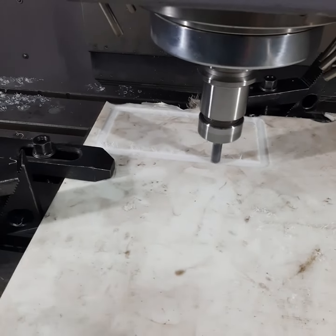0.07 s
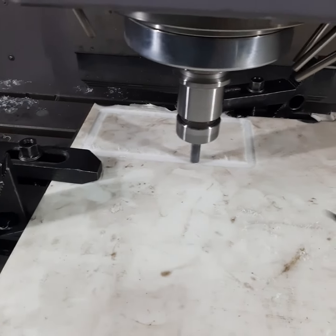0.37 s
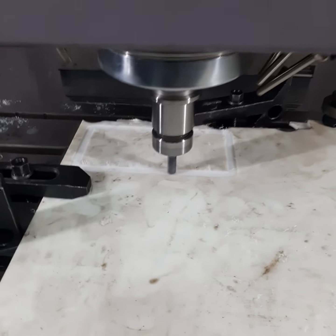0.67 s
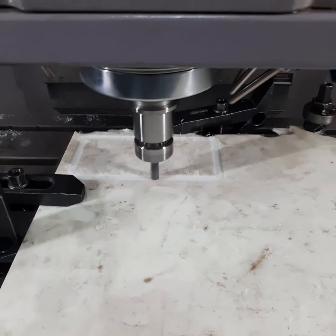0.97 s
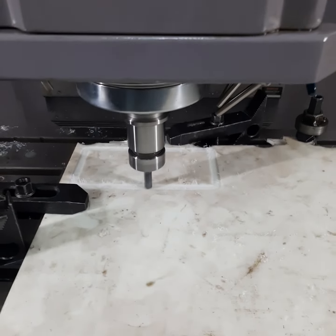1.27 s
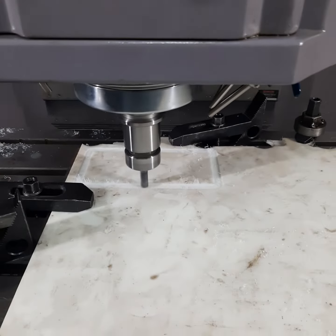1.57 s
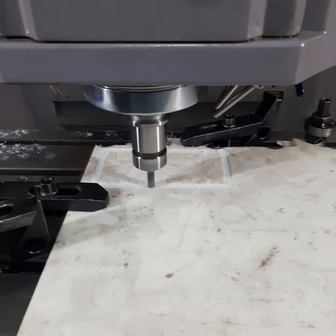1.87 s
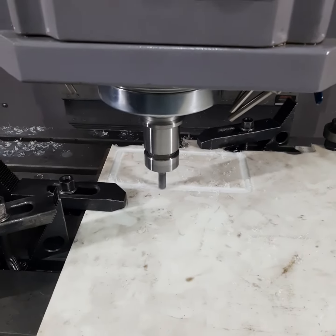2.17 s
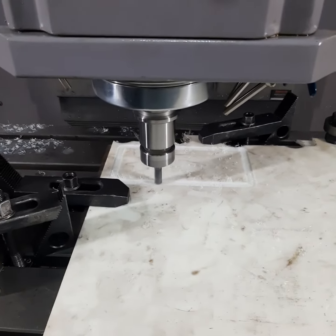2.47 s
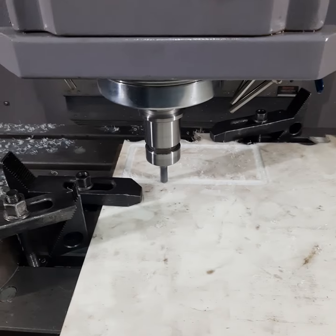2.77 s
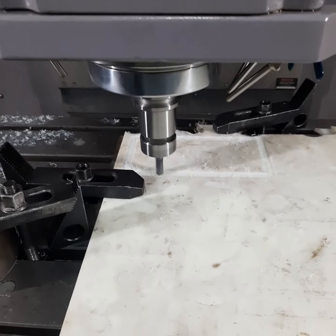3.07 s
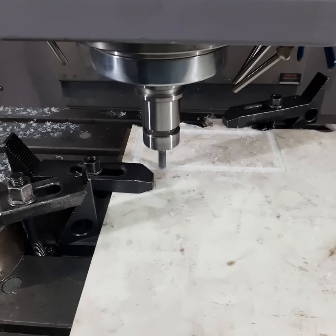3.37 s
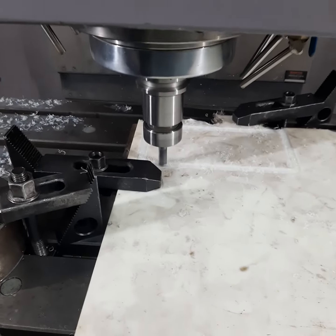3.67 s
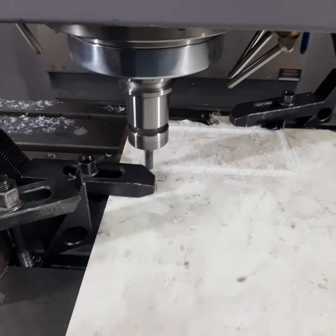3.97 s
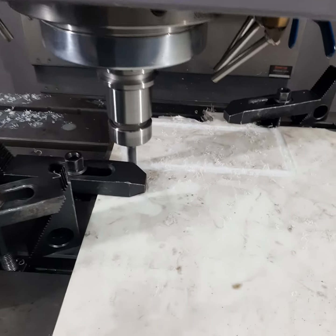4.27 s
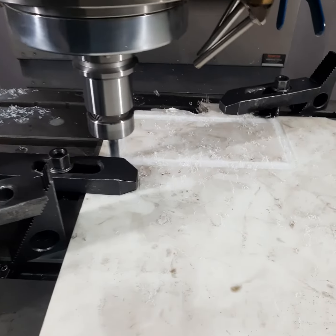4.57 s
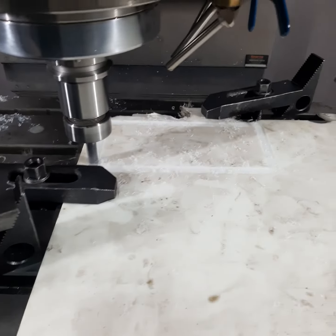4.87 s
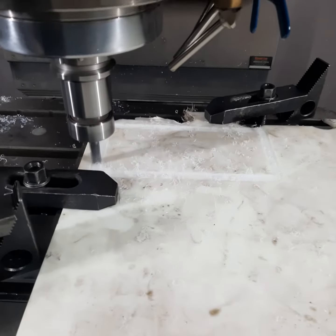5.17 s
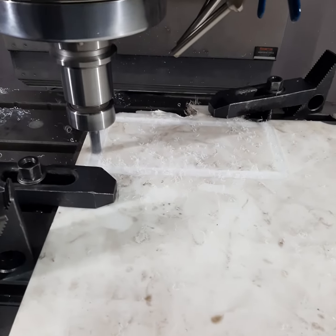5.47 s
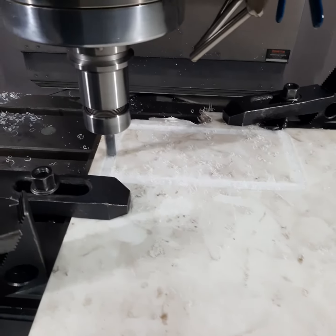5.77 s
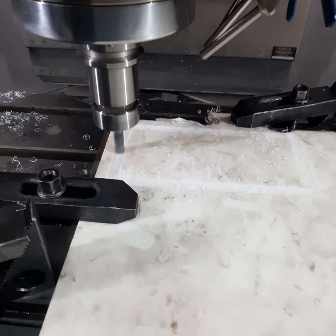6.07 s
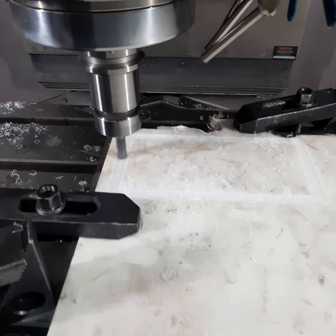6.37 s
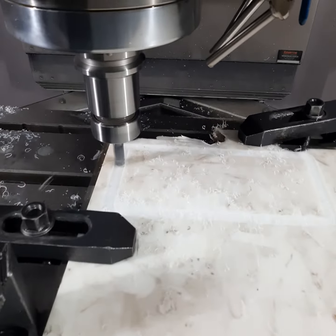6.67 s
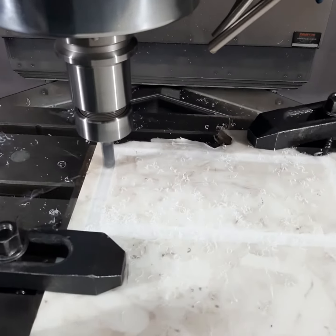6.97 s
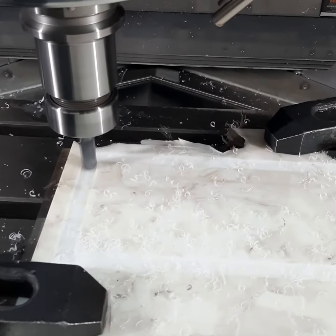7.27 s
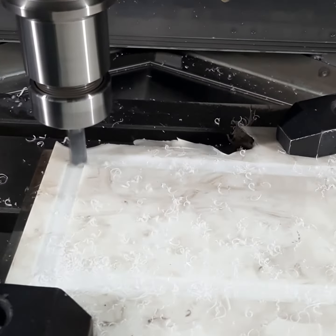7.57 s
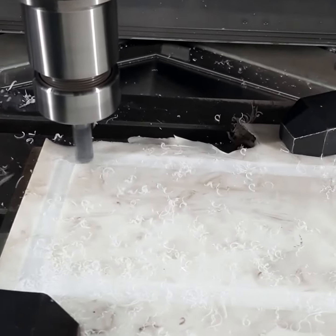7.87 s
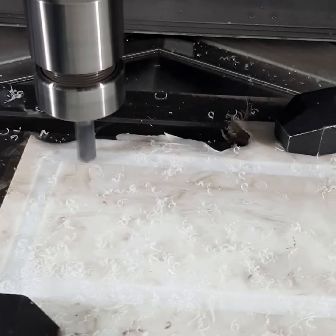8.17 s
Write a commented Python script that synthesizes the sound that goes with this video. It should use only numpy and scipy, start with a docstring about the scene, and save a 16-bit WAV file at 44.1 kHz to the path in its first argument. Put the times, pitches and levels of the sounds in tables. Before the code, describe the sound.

Inside a workshop machine enclosure, a short, sharp blast of air opens over a whining spindle and a humming pump. The level dips and recovers, and the cutter keeps rasping through a slab. A faint spit of air follows while a motor drone swells and fades. The cut changes tone at two turns, sounding fuller with fast, light ticks as the hand-held microphone closes in.

```python
"""A milling spindle spins at 1800 rpm inside a machine cabinet, whining and throbbing over a buzz and a pump's hum.
First an air gun blasts the chips away; the automatic volume control dips and creeps back a second later.
The cutter rasps across a slab; near 2 s a little air spits out while a drone of motors swells and fades.
At 4.7 s the cutter heads along the slab and at 7.7 s it heads back, with a new chord for each direction.
Through the second half the hand-held microphone closes in, and the cutter ticks more clearly."""
import sys
import numpy as np
from scipy import signal
from scipy.fft import rfft, irfft, next_fast_len
from scipy.io import wavfile
from scipy.ndimage import uniform_filter1d, minimum_filter1d, map_coordinates

SR = 44100
rng = np.random.default_rng(int(sys.argv[2]) if len(sys.argv) > 2 else 0)


def bounce(signal):
    """Save signal as a 16-bit WAV file at the path given by the first command-line argument."""
    frames = np.transpose(np.atleast_2d(signal))
    limited = np.clip(frames, -1, 1)
    pcm = np.round(limited * 32767).astype(np.int16)
    wavfile.write(sys.argv[1], SR, pcm)


N = 362061
TIME = np.arange(N) / SR
SPINDLE_HZ, PUMP_HZ, TOP_HZ = 29.988, 58.8, 15780
WHINE_ORDER = 48  # an "order" is a tone that vibrates this many times per turn of the spindle

# The whine's four tones change as the microphone moves through loud and quiet spots in the cabinet:
# (time [s], left level [dB], right level [dB], left ear's lead [rad], left throb [relative],
#  right throb [relative], swing between the ears [rad], pitch bend [rad])
FIRST_TONE = [(0.72, -42, -27.5, 1.6, 0.5, 0.07, 1.3, -0.5), (0.9, -37, -26.5, 4, 1.0, 0.2, 1.9, -0.7),
              (1.08, -37, -26.5, 0, 0.69, 0.1, 1.8, -0.79), (1.98, -31.5, -26.5, -1.5, 0.17, 0, 1.4, -0.78),
              (2.64, -39, -29.5, 0.5, 1.0, 0.3, 0.5, -0.3), (2.88, -37, -28.5, -2, 0.08, 0.3, -1.8, 0.7),
              (3.78, -32.5, -25, 0.7, 0, 0.24, -1.5, 0.76), (4.02, -38, -26.5, 3.5, 0.41, 0.09, -0.8, 0.5),
              (4.2, -30.5, -26.5, 3.5, 0, 0.3, -0.44, 0.2), (4.38, -29.0, -27.0, 4, 0, 0, -0.25, -0.27),
              (4.68, -30.5, -39, 3, 0, 0.44, -0.2, -0.23), (4.98, -31.5, -30, 7, 0.3, 0.04, 0.1, 0.4),
              (5.52, -27.0, -23, 8.5, 0.5, 0.16, -0.67, 0.46),
              (6.06, -28, -30.5, 9.5, 0.4, 0.3, -0.12, -0.1), (6.36, -35, -26, 8.5, 0.6, 0.65, 0.96, -0.5),
              (6.6, -35.5, -21.0, 10, 0.85, 0.24, -1.3, 0.4), (7.14, -35, -28.5, 10, 0.46, 0.4, -1.4, 0.3),
              (7.62, -31.5, -31.5, 10, 0.31, 0.75, 0.43, 0.071),
              (8.1, -36, -38.0, 11, 0.28, 0.79, 0.96, -0.3)]
SECOND_TONE = [(0.72, -36, -32, -1, 0.44, 0.11, 0.2, 0.1), (0.96, -25, -27, -2, 0.52, 0.03, -0.4, 0.42),
               (1.2, -34, -23.5, -2.5, 0.77, 0.09, 0.42, -0.1),
               (1.621, -40, -33, -2.3, 0.99, 0.01, 0.0049, -0.0036),
               (2.16, -43, -35, -0.8, 1.0, 0.72, -1.6, 0.3), (2.58, -31, -38, -1.2, 0.75, 0.26, 0.0, 0.0),
               (2.941, -31, -32.5, 0.5, 0.71, 0.06, -0.26, 0.1),
               (3.06, -32, -31, -1, 0.43, 0.05, -0.6, 0.1),
               (3.6, -28, -28.5, -1.1, 0.08, 0.21, -0.67, 0.22),
               (3.72, -29, -27, -0.5, 0.31, 0.19, -0.48, 0.22),
               (3.9, -33, -33, -1.3, 0.37, 0.42, -0.49, 0.48),
               (4.08, -27.5, -37, -4, 0.13, 0.61, 0.79, 0.074),
               (4.38, -36, -29, -8.5, 0.55, 0.37, 1.6, -0.0), (4.62, -28.5, -34, -8, 0.27, 0.5, 0.14, 1.4),
               (5.22, -32, -26.5, -8, 0.85, 0.23, 0.75, 0.36),
               (5.4, -33, -27, -6.5, 0.72, 0.22, -1.2, 0.62),
               (5.82, -27, -32, -8.5, 1.0, 0.36, -0.018, 0.72),
               (6.48, -30, -24.5, -7.7, 0.82, 0.1, 0.5, -0.29),
               (6.66, -30, -29.5, -7.7, 0.42, 0.29, -0.69, -0.15),
               (7.38, -26, -36, -8, 0.29, 0.52, -0.35, -0.3),
               (8.1, -24.5, -27, -8, 0.26, 0.31, 0.022, -0.2)]
THIRD_TONE = [(0.72, -38, -41.5, -1.7, 0.2, 0.61, 0.6, 0.4), (0.84, -26, -45.0, -0.5, 1.0, 0.7, 1.1, 0.072),
              (1.08, -26.5, -39, -8, 0.44, 0.42, -0.46, 0.31), (1.38, -25, -44.0, 1, 0.3, 0.73, 1.2, 0.44),
              (1.62, -30, -44.0, -5.5, 0.53, 0.48, 1.6, -1.4),
              (1.92, -28, -44.0, 1, 0.21, 0.91, -1.6, -1.3),
              (2.16, -21.5, -37, -4, 0.27, 0.31, -0.18, -0.59),
              (2.94, -28.5, -36.0, -3.5, 0.64, 0.15, -1.0, -0.49),
              (3.12, -32, -39, -3, 0.77, 0.75, -1.6, 0.42),
              (3.66, -22.5, -33, -0.7, 0.17, 0.3, -1.7, -0.32),
              (3.84, -31, -36.0, -0.4, 0.51, 0.4, 0.47, 1.4), (4.02, -27.5, -43, -2, 0.26, 0.57, 0.16, 0.3),
              (4.32, -32, -36, -4, 0.51, 0.45, 1.4, 0.1),
              (4.56, -21, -34.5, -3.5, 0.16, 0.47, 0.025, -0.67),
              (5.1, -29, -32, -5, 0.41, 0.31, -0.89, -0.31),
              (5.28, -28, -39.5, -1.5, 0.17, 0.63, 0.42, 0.27),
              (5.94, -18.5, -39, -4, 0.2, 0.33, -0.061, 0.091),
              (6.12, -21.5, -31.5, -3.5, 0.38, 0.25, 0.48, 0.06),
              (6.78, -24.5, -26.5, -2.5, 0.11, 0.13, -0.63, -0.28),
              (7.26, -20, -32, -4, 0.19, 0.24, -0.1, -0.83), (7.44, -22, -27, -3.5, 0.19, 0.15, -0.5, -0.6),
              (8.1, -25.5, -25, -2.5, 0.33, 0.31, -0.93, -0.18)]
FOURTH_TONE = [(0.72, -36, -58.5, -1, 0.46, 0.47, 0.7, 1.1), (1.44, -41, -56.5, 17, 0.42, 0.11, 1.3, -1.4),
               (1.98, -35, -59.0, 2, 0.92, 0.49, -1.5, -0.4), (2.22, -39, -62, 11, 0.15, 1.0, -1.5, 1.0),
               (3.36, -39.0, -56, 3, 0.52, 0.54, -0.8, -1.3), (3.66, -43, -56, 6, 0.96, 0.7, -0.9, -1.4),
               (3.84, -32.5, -50.5, 4.5, 0.65, 0.74, -1.1, -0.7),
               (4.08, -39, -47, 7.9, 0.27, 0.09, -1.3, -1.4),
               (4.32, -33, -54.0, 9.5, 0.48, 0.47, 1.3, -0.4), (4.5, -44, -51.0, 5.6, 0.22, 0.55, 0.8, 1.4),
               (4.92, -33.5, -59, 5, 0.58, 0.3, -1.4, -0.54),
               (5.64, -31, -62.0, 5.4, 0.12, 0.53, -0.56, 0.07),
               (6.0, -44, -52.0, 3, 0.41, 0.3, -0.82, -1.0),
               (6.84, -30, -56.0, 1.5, 0.29, 0.23, 0.2, -0.64), (8.1, -38, -64, 11, 0.32, 1.0, -1.6, -1.4)]
# Each tone's roughness: (base level far away [dB], base level close up [dB],
#  lower minus upper side tones [dB], head start of the right ear's throb [rad])
WHINE_RASP = [(-44.5, -49, 1, -1.45), (-47.5, -40.5, -1, -0.47), (-40.5, -38.5, 6, 1.3),
              (-48.5, -52.5, 5, 0.7)]


def whine(angle, throb=0.87, rasp_follow=0.32):
    """The drive sings four high tones; its slightly off-centre rotor makes them throb once a turn."""
    out = np.zeros((2, N))
    for k, rows in enumerate([FIRST_TONE, SECOND_TONE, THIRD_TONE, FOURTH_TONE]):
        order, columns = (k + 1) * WHINE_ORDER, curves(rows)
        far_db, near_db, lean_db, head_start = WHINE_RASP[k]
        db, lead, (swing, bend) = columns[:2], columns[2], columns[5:]
        depth = np.clip(throb * columns[3:5], 0, 1)
        turn = angle + np.array([[0], [head_start]]) + 0.11 * drift(4.3)
        lead = lead + swing * np.cos(turn[0])
        waver_db, waver_rad = .8 * drift(22.), .11 * drift(35.)
        phase = order * angle + np.array([lead, -lead]) / 2 + bend * np.sin(turn) + waver_rad
        pulse = 1 + depth * (np.cos(turn) + .15 * np.cos(2 * turn))
        out += amp(db + waver_db) * pulse * np.cos(phase)
        rasp_db = by_nearness(far_db, near_db) + rasp_follow * (db - db.mean())
        rasp = side_tones(angle, order, pairs=3, unrest=2.8, rate=9., falloff_db=5.5, lean_db=lean_db)
        out += amp(rasp_db) * rasp
    return out


# How the whistle rises and falls: (time [s], base level [dB])
WHISTLE_LEVEL = [(.7, -42), (2.3, -54), (2.9, -46), (3.45, -42.5), (3.75, -49), (4.1, -42), (4.7, -45),
                 (5.2, -43), (5.75, -39), (6.05, -56), (6.4, -43.5), (6.8, -44), (8.1, -45)]


def whistle(angle):
    """The whine's fifth tone frays into a cluster, centred one order low and heard on the left."""
    order = 5 * WHINE_ORDER - 1
    tone = amp(-3) * np.cos(order * angle + drift(2.77))
    fray = amp(-5) * side_tones(angle, order, pairs=3, rate=4., falloff_db=4.)
    return ears(22)[:, None] * amp(curves(WHISTLE_LEVEL)[0]) * (tone + fray)


# The spindle's thin tones: (order [cycles per turn])
HIGH_ORDERS = [56, 59, 68, 76, 116, 121, 123, 124, 134, 171, 182, 219]
# One row for each: (far level [dB], halfway level [dB], near level [dB],
#  side tones against the main tone [dB], left minus right [dB])
HIGH_LEVELS = [(-54, -54, -62, -10, 8), (-45, -54, -56, -12, 0), (-49, -40, -40.5, -7, -1),
               (-55, -49, -58, -19, 0), (-54, -41, -37, -25, 4), (-55, -35, -49, -12, 14),
               (-35, -43, -48, -14, 5), (-44, -61, -49, -6, 8), (-51, -42, -55, -6, 8),
               (-58, -57, -57, -23, 10), (-40.5, -51, -56, -7, 18), (-60, -60, -59, -11, 22)]


def thin_tones(angle):
    """The spindle adds faint high tones, each wavering on its own in either ear."""
    out = np.zeros((2, N))
    for order, (*levels_db, side_db, pan_db) in zip(HIGH_ORDERS, HIGH_LEVELS):
        tone = np.cos(order * angle + drift(0.93))
        level = amp(by_nearness(*levels_db) + 1.2 * drift(2.06))
        out += ears(pan_db)[:, None] * level * (tone + amp(side_db) * side_tones(angle, order, pairs=1))
    return out


# The tones that make up the buzz: (frequency [Hz], typical level of each [dB])
BUZZ_SPECTRUM = [(30, -68), (90, -54), (300, -52), (750, -51.5), (1200, -51.5), (1800, -62.5),
                 (2400, -63.5), (3000, -56.5), (4300, -57.5), (5300, -59), (7000, -71.5), (11500, -100),
                 (15000, -96)]


def buzz(angle, scatter_db=5.0, changing_share=0.8, size=8192):
    """Every turn repeats one rough pattern, which shifts as the microphone moves through the echoes."""
    hz = np.arange(int(TOP_HZ / SPINDLE_HZ)) * SPINDLE_HZ
    db = read(BUZZ_SPECTRUM, hz) + scatter_db * rng.standard_normal(len(hz))
    level = amp(db) * machine_ears(hz) * (hz > 0)
    level[:, CHORD_ORDERS] = 0  # the cut and the whine play their own orders
    level[:, [k * WHINE_ORDER + side for k in (1, 2, 3) for side in (-1, 0, 1)]] = 0
    steady = np.sqrt(1 - changing_share) * np.exp(1j * np.angle(random_pair(hz)))
    place = angle / (2 * np.pi) % 1 * size
    moments = np.linspace(0, TIME[-1], 15)
    out = np.zeros((2, N))
    for moment in moments:  # each pattern fades into the next
        changing = np.sqrt(changing_share) * random_pair(hz)
        pattern = irfft(level * (steady + changing), size) * size / np.sqrt(2)
        fade = 1 - abs(TIME - moment) / moments[1]
        now = fade > 0
        out[:, now] += fade[now] * np.array([np.interp(place[now], np.arange(size), e) for e in pattern])
    return out


# The cutter's passes across the slab, along it and back: (start [s], end [s])
PASSES = [(-0.2, 4.66), (4.68, 7.62), (7.66, 8.6)]
# The low tones that cutting draws from the slab: (order [cycles per turn])
CHORD_ORDERS = [8, 10, 12, 13, 14, 15, 16, 17, 18, 19, 20, 22, 24, 33, 37, 38, 39]
# Each tone's level: (across start [dB], across middle [dB], across end [dB],
#  along start [dB], along middle [dB], along end [dB], way back [dB])
CHORD_LEVELS = [(-30.5, -30, -29.5, -38.5, -36.5, -37, -27), (-56, -44.5, -35.5, -43, -43, -41, -37),
                (-67, -74, -56, -36, -37.5, -51, -56), (-34, -37, -57, -49, -47, -57, -58),
                (-37.5, -32.5, -48, -63, -64, -51, -57), (-32, -45, -67, -53, -44, -34.5, -36.5),
                (-44, -32.5, -41, -39, -39, -44, -42), (-35.5, -39, -63, -56, -64, -53, -42),
                (-62, -59, -45, -42, -36.5, -38, -54.5), (-33, -39, -46, -44, -38, -33.5, -41),
                (-32.5, -42, -52, -55, -46, -49, -54), (-56, -46, -53, -58, -36, -33.5, -34.5),
                (-37, -41, -47, -62, -55, -58, -60), (-57, -40, -44, -57, -63, -52, -56),
                (-47, -37.5, -45, -49, -57, -43, -49), (-52, -41, -39, -40, -36.5, -38, -45),
                (-53, -57, -53, -39, -63, -52, -37)]


def cut_chords(angle, fade_s=0.25, middle=0.42):
    """Each pass has its own unsteady chord, which shifts as the cutter travels and fades at corners."""
    out = np.zeros((2, N))
    chords = np.split(np.array(CHORD_LEVELS), [3, 6], axis=1)
    for (start, end), chord in zip(PASSES, chords):
        now = (TIME >= start) & (TIME < end)
        t = TIME[now]
        progress = (t - start) / (end - start)
        from_corner_s = np.minimum(t - start, end - t)
        fade = np.sin(np.pi / 2 * np.minimum(from_corner_s / fade_s, 1)) ** 2
        for order, levels in zip(CHORD_ORDERS, chord):
            hz = order * SPINDLE_HZ
            waver_db, waver_rad = drift(7., t=t) * np.array([[1.6], [.3]]) * np.sqrt(hz / 500)
            db = np.interp(progress, [0, middle, 1][:len(levels)], levels) + waver_db
            # short waves reach the two ears out of step
            apart = (1 - read(EAR_LIKENESS, hz)) * np.array([[1], [-1]]) * np.pi / 4
            tone = np.cos(order * angle[now] + apart + waver_rad)
            out[:, now] += machine_ears(hz)[:, None] * fade * amp(db) * tone
    return out


# The rush of cutting and cooling: (frequency [Hz], level [dB per Hz])
RUSH_SPECTRUM = [(20, -100), (32, -91), (50, -55.5), (85, -67), (135, -56.5), (230, -62.5), (330, -57.5),
                 (720, -64.5), (830, -61), (930, -58), (1100, -70), (1500, -64.5), (1750, -71.5),
                 (2050, -66.5), (2400, -70.5), (3100, -66.5), (3600, -66.5), (3870, -67), (4400, -65),
                 (5600, -72), (7100, -72.5), (11500, -88.5), (15300, -96)]


def cutter(angle, tick_sharpness=4.9):
    """The cutter rasps; close up it sounds fuller and ticks once a turn, ringing at two pitches."""
    rush = noise(lambda hz: amp(read(RUSH_SPECTRUM, hz)) * machine_ears(hz))
    rush *= (1 + 0.0049 * np.cos(angle)) * amp(0.055 * drift(2.4, channels=1))
    rings = amp(-37) * (band(3600, octaves=0.052) + band(2050, octaves=0.065))
    tick = np.exp(tick_sharpness * (np.cos(angle) - 1)) * rings
    body = amp(-39) * band(850, octaves=0.91)
    return rush + by_nearness(0, 1) * (tick + body)


# Groans of the cut:
# (time [s], half length [s], pitch [Hz], width [octaves], left level [dB], right level [dB])
GROANS = [(2.87, 0.2, 520, 0.26, -38, -37), (2.85, 0.23, 940, 0.12, -41, -39),
          (2.79, 0.043, 870, 1.9, -28.5, -34), (2.9, 0.24, 123, 0.13, -36.5, -36),
          (5, 0.39, 160, 0.53, -43, -49), (7.76, 0.32, 130, 0.7, -34.5, -34.5)]


def rumbles():
    """The cut rumbles and groans in places, as at the corners of its path."""
    return swells(GROANS)


# The air gun's hiss: (frequency [Hz], base level [dB per Hz])
AIR_SPECTRUM = [(20, -95), (70, -52), (200, -53), (550, -53), (1200, -53.5), (2500, -53), (3500, -50),
                (4300, -48.5), (5500, -44.5), (6900, -40.5), (7700, -41.5), (10000, -46.5), (11800, -53),
                (14000, -53), (15400, -49.5)]
# Its flow until the valve shuts: (time [s], level change [dB])
AIR_FLOW = [(0, 0), (.365, 0), (.39, 0), (.41, -3), (.47, 3), (.5, -1), (.562, -2)]
# How far it leans to the left: (frequency [Hz], left minus right [dB])
AIR_BALANCE = [(60, 21.5), (110, 23), (200, 18.5), (380, 20), (700, 13), (1290, 5), (2380, 2), (3700, 4),
               (4800, 10.5), (7000, 23), (10000, 11.5), (15000, 7)]


def air_gun(echo_s=0.37):
    """A jet of air hisses and flutters; when the valve shuts, the sound dies away in the cabinet."""
    jet = noise(lambda hz: amp(read(AIR_SPECTRUM, hz)) * ears(read(AIR_BALANCE, hz)), likeness=0.5)
    tail_db = -60 * np.maximum(TIME - AIR_FLOW[-1][0], 0) / echo_s
    flutter_db = drift(58.7, channels=1)
    return jet * amp(curves(AIR_FLOW)[0] + tail_db + flutter_db)


# Bursts in the jet:
# (time [s], half length [s], pitch [Hz], width [octaves], left level [dB], right level [dB])
AIR_BURSTS = [(.195, 0.031, 1170, 1.4, -12.5, -18), (.315, 0.02, 1530, 0.72, -17.5, -14),
              (.498, 0.014, 250, 1.8, -15, -32), (.54, 0.024, 610, 1.4, -18.5, -20),
              (.552, 0.019, 4230, 0.29, -9, -18)]


def sputters():
    """The jet sputters as it sweeps over edges."""
    return swells(AIR_BURSTS)


# The pump's loudest tone, at three times its base pitch: (time [s], level [dB])
PUMP_THIRD = [(0.72, -30), (1.2, -26.5), (2.48, -29), (2.8, -26.5), (4.64, -28), (4.88, -26), (6.48, -28.5),
              (7.44, -28.0), (8.16, -30)]
# The other motors' steady hum: (frequency [Hz], level [dB])
MOTOR_HUMS = [(52, -42.5), (41.0, -67), (133.1, -47.5), (373.4, -46), (403, -45)]


def hum(angle):
    """The pump's hum pulses against the spindle's nearby sixth order; other motors join in."""
    pump = 2 * np.pi * PUMP_HZ * TIME
    out = amp(-42) * np.cos(pump) + amp(curves(PUMP_THIRD)[0]) * np.cos(3 * pump)
    out += amp(-42) * np.cos(6 * angle)
    for hz, db in MOTOR_HUMS:
        out = out + amp(db) * np.cos(2 * np.pi * hz * TIME + .5 * drift(2.51, channels=1))
    return out


# Motor tones close together in pitch: (frequency [Hz], loudest level [dB])
DRONE_TONES = [(388, -39), (417.8, -40.5), (446.4, -40), (482.2, -43)]


def drone(loudest_s=2.3, half_length_s=0.95):
    """A buzzy chord of motor tones rises and fades during the first pass."""
    swell = np.exp(-.5 * ((TIME - loudest_s) / half_length_s) ** 2)
    return swell * sum(amp(db) * np.cos(2 * np.pi * hz * TIME + .59 * drift(3.04))
                       for hz, db in DRONE_TONES)


def puff(start_s=2.003, rise_s=0.006, fade_s=0.48):
    """A faint, thin spit of air on the left."""
    age = np.maximum(TIME - start_s, 0)
    level = np.minimum(age / rise_s, 1) * amp(-35 - 60 * age / fade_s)
    return band(9000, octaves=0.79) * ears(12)[:, None] * level


def side_tones(angle, order, pairs, unrest=1.5, rate=1.75, falloff_db=10., lean_db=0.):
    """The off-centre rotor roughens a tone by adding drifting neighbours, one order apart."""
    coarse, sway = TIME[::32], 0
    for step in range(1, pairs + 1):
        for side in (-1, 1):
            wander = drift(rate, channels=4, t=coarse) * unrest / np.sqrt(2)
            size = np.exp(2j * np.pi * rng.random((2, 1))) + wander[:2] + 1j * wander[2:]
            level = amp(-falloff_db * (step - 1) - side * lean_db / 2)
            sway = sway + level * size * np.exp(1j * side * step * angle[::32])
    sway = np.array([np.interp(TIME, coarse, ear) for ear in sway]) / np.sqrt(1 + unrest ** 2)
    return (sway * np.exp(1j * order * angle)).real


# How close the microphone is to the cutter: (time [s], nearness [0 far, 1 near])
MICROPHONE_PATH = [(0, 0.3), (3.2, 0), (4.4, 0.45), (5.2, 0.42), (6.4, 0.7), (7.4, 0.99), (7.7, 1),
                   (8.2, 0.9)]


def by_nearness(*values):
    """Slide through the values, from far to near, as the microphone closes in."""
    return np.interp(curves(MICROPHONE_PATH)[0], np.linspace(0, 1, len(values)), values)


# Which side the machine is louder on: (frequency [Hz], left minus right [dB])
MACHINE_BALANCE = [(60, 3.5), (110, 0), (200, -3), (380, 1.5), (700, 1), (1290, 0), (2380, 5), (4400, 7),
                   (8120, 27.5), (15000, 1.5)]


def machine_ears(hz):
    """The machine's left and right volume at each frequency."""
    return ears(read(MACHINE_BALANCE, hz))


# How alike the two ears' sound is: (frequency [Hz], likeness [0-1])
EAR_LIKENESS = [(50, 1), (170, 0.88), (350, 0.79), (700, 0.12), (1400, 0.014), (15000, 0.024)]


def random_pair(hz, likeness=1):
    """Random spectra for two ears: alike in the bass, unrelated in the treble."""
    a, b = (rng.standard_normal((2, len(hz))) + 1j * rng.standard_normal((2, len(hz)))) / np.sqrt(2)
    same = np.clip(likeness * read(EAR_LIKENESS, hz), -1, 1)
    return np.array([a, same * a + np.sqrt(1 - same ** 2) * b])


def noise(strength, likeness=1, size=N):
    """Stereo noise shaped by strength(hz), an amplitude per root Hz."""
    padded = next_fast_len(size, True)
    hz = np.fft.rfftfreq(padded, 1 / SR)
    return irfft(random_pair(hz, likeness) * strength(hz), padded)[:, :size] * np.sqrt(padded * SR / 2)


def band(centre_hz, octaves, size=N):
    """Stereo noise of level 1, gathered around one pitch."""
    x = noise(lambda hz: np.exp(-.5 * (np.log2((hz + 1) / centre_hz) / octaves) ** 2) / np.sqrt(hz + 1),
              size=size)
    return x / x.std()


def swells(rows, size=65536):
    """One short rise and fall of noise for each row."""
    out = np.zeros((2, N))
    for peak_s, half_s, hz, octaves, left_db, right_db in rows:
        first = int(np.clip(peak_s * SR - size / 2, 0, N - size))
        now = slice(first, first + size)
        swell = np.exp(-.5 * ((TIME[now] - peak_s) / half_s) ** 2)
        out[:, now] += band(hz, octaves, size) * amp([[left_db], [right_db]]) * swell
    return out


def drift(rate, channels=2, t=TIME):
    """A smooth random wobble of about size 1 that changes about rate times a second."""
    knots = rng.standard_normal((channels, 1024))
    coarse = TIME[::256]
    return np.array([np.interp(t, coarse, map_coordinates(k, [coarse * rate], mode="wrap"))
                     for k in knots])


def ears(side_db):
    """Share a sound between the ears, the left louder by side_db."""
    pair = np.array([amp(side_db / 2), amp(-side_db / 2)])
    return pair / np.sqrt(np.mean(pair ** 2, axis=0))


def curves(rows):
    """Join the rows of a time table into one curve per column."""
    times, *columns = np.transpose(rows)
    return np.array([np.interp(TIME, times, column) for column in columns])


def read(rows, hz):
    """Look up a frequency table, sliding between rows by pitch."""
    row_hz, value = np.transpose(rows)
    return np.interp(np.log(hz + 1), np.log(row_hz + 1), value)


def amp(db):
    """Turn decibels into a multiplier."""
    return 10 ** (np.asarray(db) / 20)


def scene():
    """Add up the sounds; one almost steady spindle angle keeps the turning parts in step."""
    angle = 2 * np.pi * SPINDLE_HZ * TIME + 0.0014 * drift(8.3, channels=1)[0]
    spindle = whine(angle) + whistle(angle) + thin_tones(angle) + buzz(angle)
    cut = cut_chords(angle) + cutter(angle) + rumbles()
    return spindle + cut + hum(angle) + drone() + air_gun() + sputters() + puff()


# The microphone's openings swallow a narrow slice of treble: (frequency [Hz], level change [dB])
MICROPHONE_COLOUR = [(7200, 0), (7800, -6.5), (8250, -17.5), (8780, -45), (9300, -18.5), (10000, -8.5),
                     (11500, 2.5)]


def record(dry, threshold_db=-13.0, hold_s=1.15, recovery_db_per_s=11.0):
    """The microphone colours the sound; loud moments turn the volume down; the top treble is cut."""
    padded = next_fast_len(N + SR, True)
    colour = amp(read(MICROPHONE_COLOUR, np.fft.rfftfreq(padded, 1 / SR)))
    heard = irfft(rfft(dry, padded) * colour, padded)[:, :N]
    power_db = 10 * np.log10(abs(uniform_filter1d((heard ** 2).mean(0), size=3000)) + 1e-12)
    wanted_db = np.minimum(threshold_db - power_db, 0)
    half_hold = int(hold_s * SR) // 2
    held_db = minimum_filter1d(wanted_db, 2 * half_hold + 1, origin=half_hold, mode="nearest")
    climb_db = recovery_db_per_s * TIME
    gain_db = climb_db - np.maximum.accumulate(climb_db - held_db)  # drops at once, creeps back
    treble_cut = signal.firwin(1023, TOP_HZ, window=("kaiser", 9), fs=SR)
    return signal.oaconvolve(heard * amp(gain_db), treble_cut[None], "same")


dry = scene()
out = record(dry)
bounce(out)
```